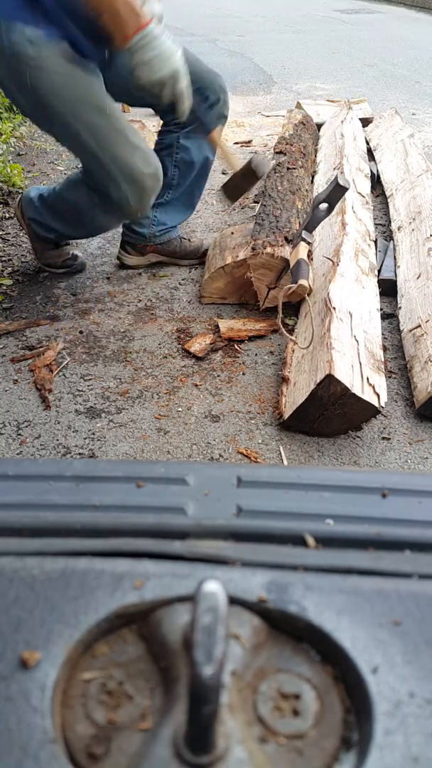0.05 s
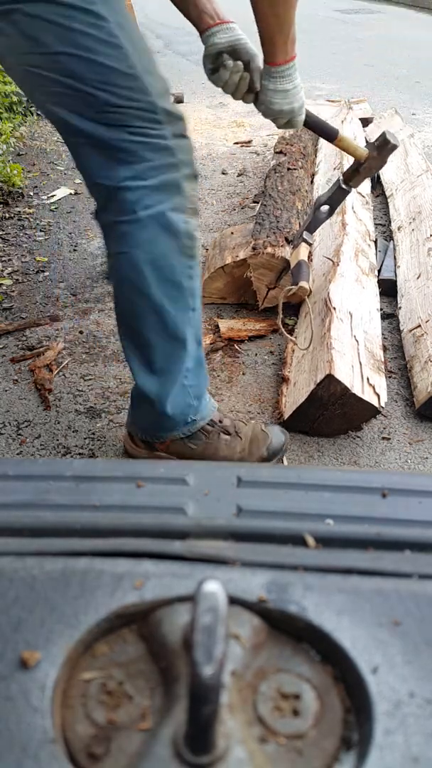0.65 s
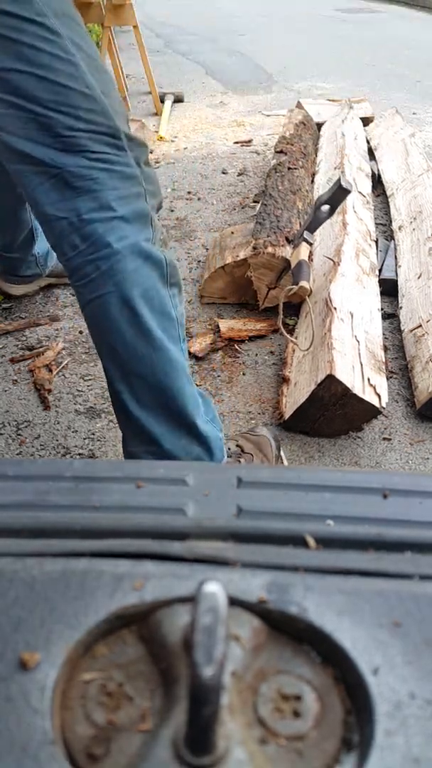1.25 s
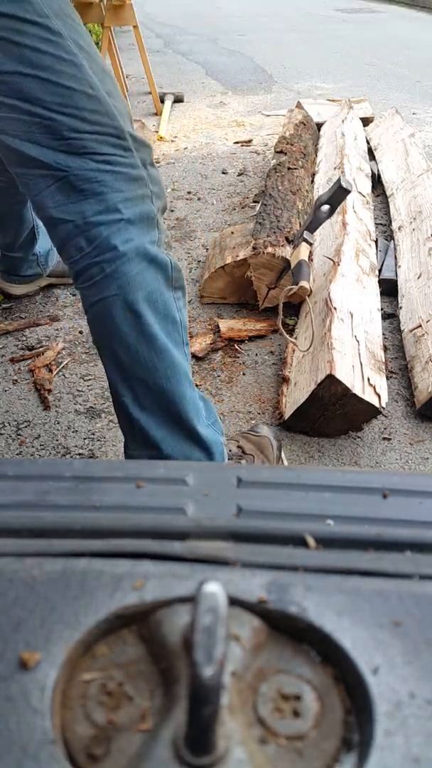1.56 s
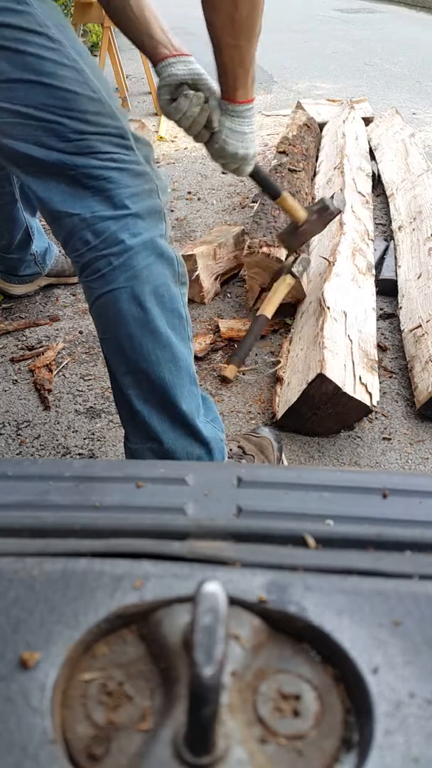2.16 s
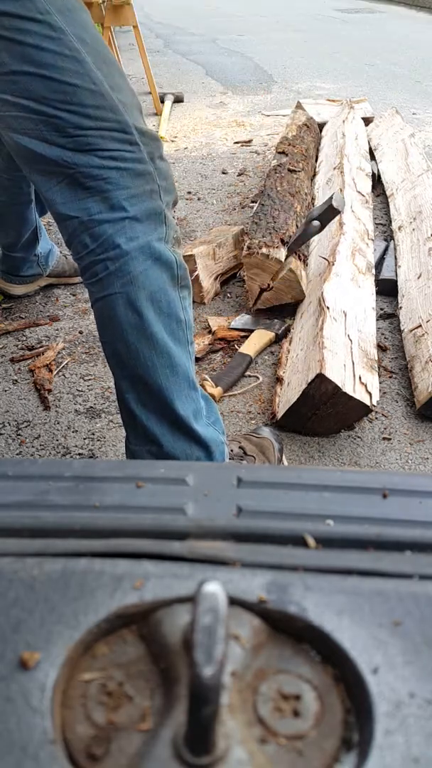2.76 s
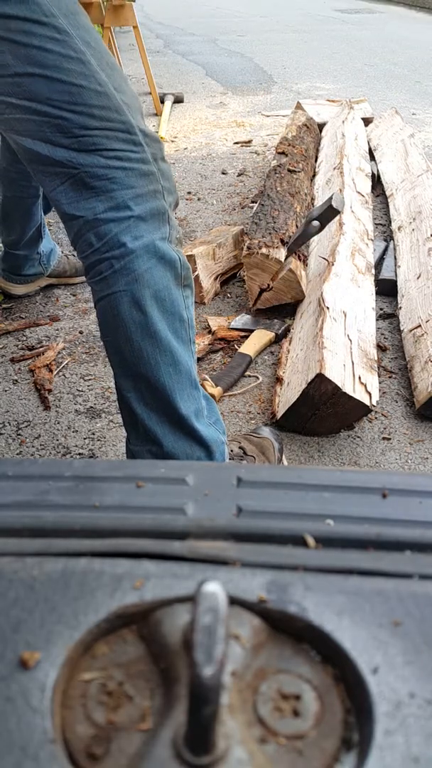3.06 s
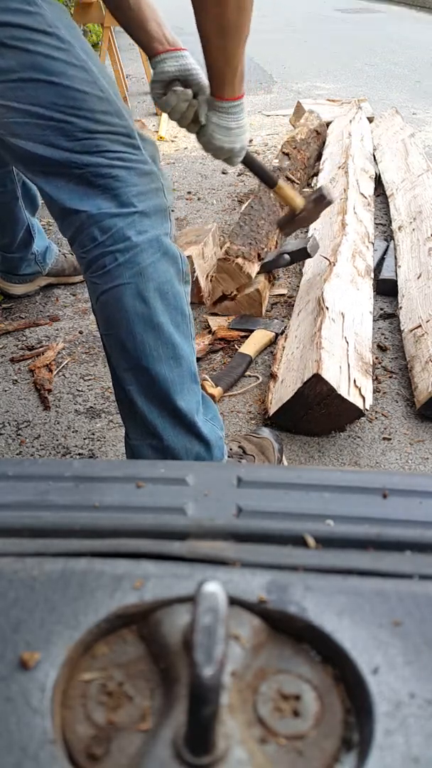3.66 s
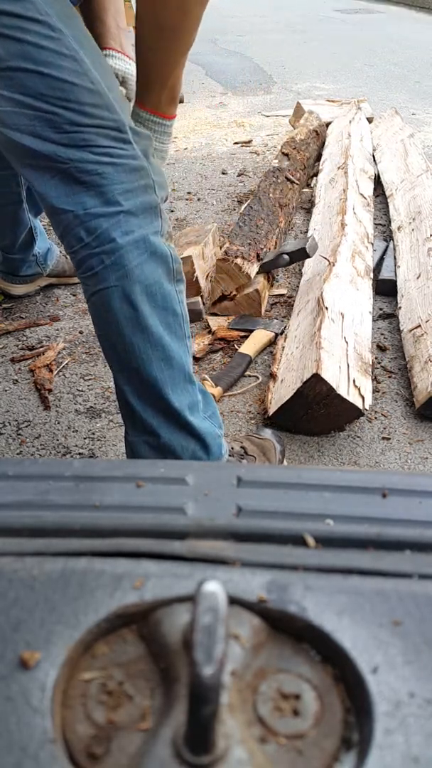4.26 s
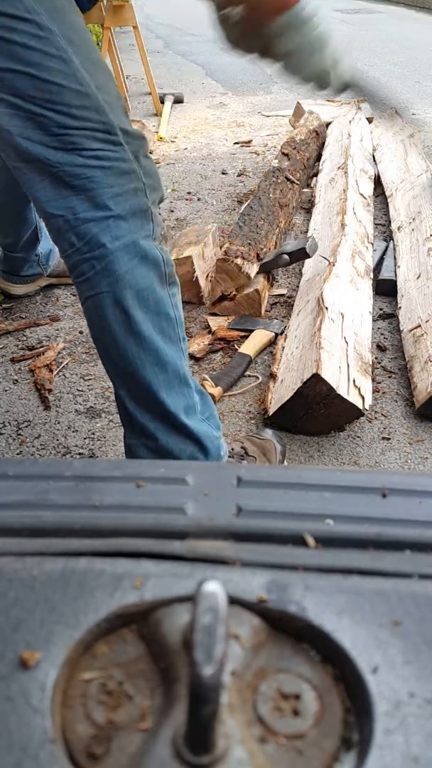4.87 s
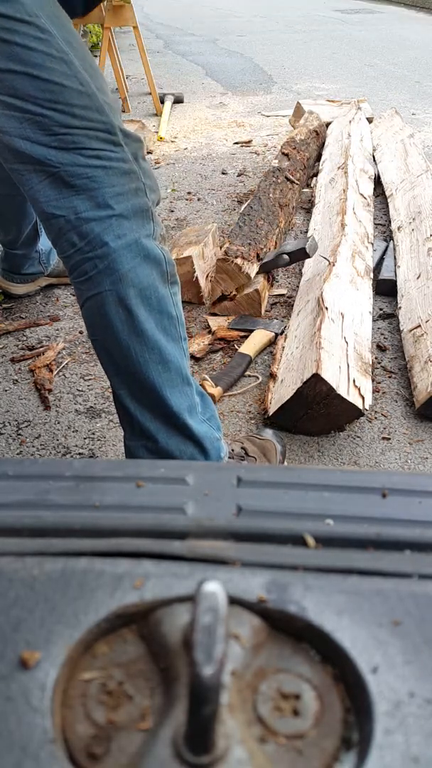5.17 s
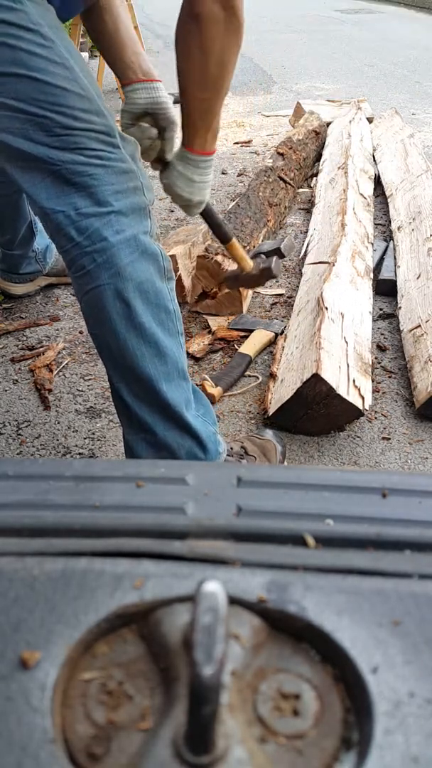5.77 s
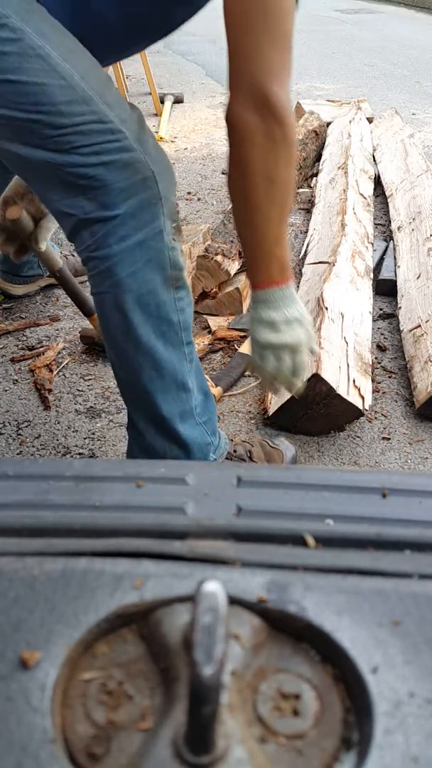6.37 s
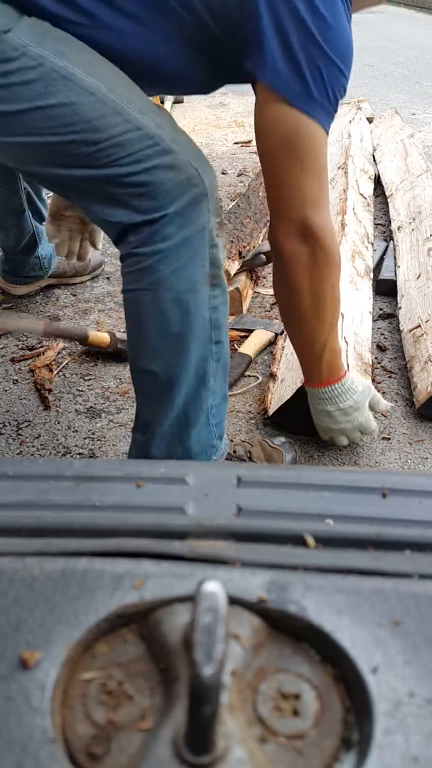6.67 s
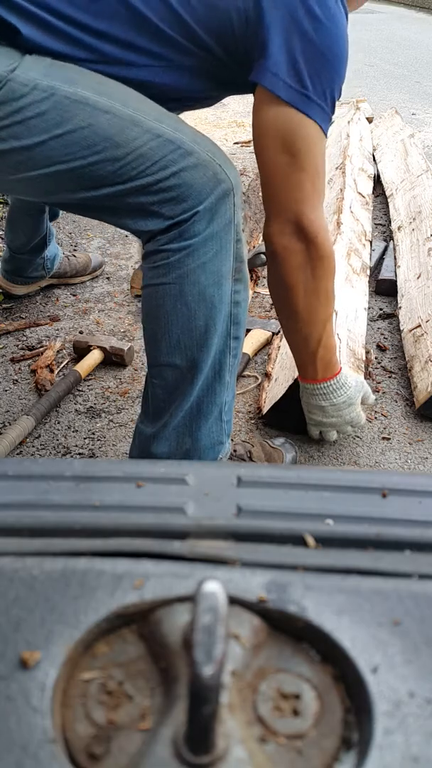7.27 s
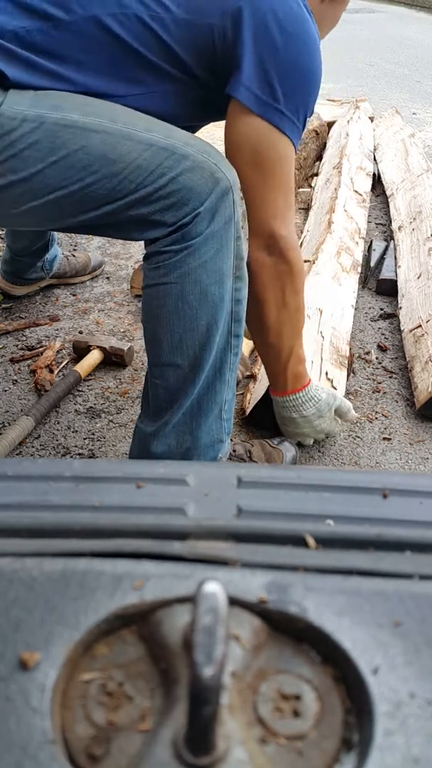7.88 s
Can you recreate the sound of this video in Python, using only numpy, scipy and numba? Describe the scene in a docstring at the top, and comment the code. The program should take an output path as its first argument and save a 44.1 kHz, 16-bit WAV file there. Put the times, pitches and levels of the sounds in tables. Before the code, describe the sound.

Four spaced hammer blows on a hatchet in wood, the first duller, the rest ringing, with wooden clatter and faint boot scuffs outdoors.

```python
"""A paved yard, where a hammer drives a steel hatchet into a log with four ringing blows.
Each blow cracks, sets both steel heads ringing and thuds into the ground. Wood knocks and rocks,
splinters snap, loose tools clink and boots scuff on grit. Hard surfaces close by smear each hit into
a short, dense tail. An automatic gain control turns the sound down at every blow, waits, and then
lets the steady outdoor rush swell back."""
import sys
import numpy as np
from scipy import signal
from scipy.fft import rfft, irfft, next_fast_len
from scipy.io import wavfile
from scipy.ndimage import uniform_filter1d, minimum_filter1d
from numba import njit

SR = 44100
rng = np.random.default_rng(int(sys.argv[2]) if len(sys.argv) > 2 else 0)


def waveform_to_disk(signal):
    """Save audio, clipped to [-1, 1], as 16-bit WAV at the path in sys.argv[1]."""
    frames = np.transpose(np.atleast_2d(signal))
    scaled = np.clip(frames, -1, 1) * 32767
    samples = np.round(scaled).astype(np.int16)
    wavfile.write(sys.argv[1], SR, samples)


N = 349713
SPAN = 16384   # samples in one short sound
AGE = np.arange(SPAN) / SR   # seconds since that sound began

# Hammer blows. Each row: start in seconds, crack in dB, treble tilt in dB per octave, thud in dB,
# hammer ring in dB, hatchet ring in dB, place hit along the hatchet from 0 to 1.
BLOWS = [(0.680, -13.5, -7, -41, -25, -28.5, 0.167), (2.0108, -5.5, 2, -16, -22, -7, 0.47),
         (3.506, -6, 2.5, -21, -19, -8.5, 0.16), (5.59, -4.5, 3, -19, -20, -11.5, 0.38)]
# The hammer's modes (its natural tones). Each row: pitch in Hz, flutters per second, level in dB.
HAMMER_MODES = [(2620, 330, 1.5), (3790, 400, -6), (5030, 600, -9.5), (11100, 600, -19)]
# The hatchet's bending modes. The lists give pitch in Hz, level in dB and flutters per second.
HATCHET_HZ = [4810, 8180, 8610, 10230, 14300]
HATCHET_DB = [2, -10, -7, -7, -11]
HATCHET_FLUTTER = [115, 260, 120, 381, 240]
# Modes of the log and of a loose tool. Each row: pitch in Hz, level in dB, seconds to fade 60 dB (t60).
LOG_MODES = [(171, -5, 0.09), (215, -3, 0.086), (338, -9.5, 0.049), (443, 1.5, 0.057), (518, 2, 0.026),
             (591.5, 2, 0.017), (646, 3.5, 0.049), (788, 1.5, 0.066), (923, 1.5, 0.042), (1180, 2.5, 0.021),
             (1674, -2.5, 0.046), (2100, 4, 0.018), (2940, 6.5, 0.0053)]
TOOL_MODES = [(328, -2.5, 0.13), (597, 2.5, 0.1), (805, 0, 0.099), (953, 0.5, 0.038), (1690, 7.5, 0.026),
              (2610, 6, 0.021), (2690, -3, 0.18), (3000, 5, 0.026)]
# Wood knocks and tool clinks. Each row: start in seconds, level in dB, centre in Hz, spread in octaves.
KNOCKS = [(0.686, -12, 562, 0.11), (2.040, -18.5, 540, 0.95), (2.085, -19, 880, 0.35),
          (2.325, -37, 594, 0.86), (2.514, -32, 573, 0.46), (2.598, -33.5, 570, 0.38),
          (2.856, -39.5, 310, 0.49), (3.737, -43, 315, 0.82), (5.773, -39, 2100, 0.65),
          (5.874, -40.5, 328, 0.96)]
CLINKS = [(2.330, -55, 2700, 0.27), (2.712, -48.5, 2630, 0.35), (6.425, -43, 1100, 0.76),
          (6.963, -39.5, 900, 2.1)]
# Splinters snapping. Each row: start in seconds, level in dB.
SNAPS = [(2.282, -55), (2.583, -57), (5.773, -45), (6.351, -52.5), (6.422, -47)]
# Boot scuffs. Each row: middle in seconds, half length in seconds, level in dB.
SCUFFS = [(0.917, 0.017, -48), (1.012, 0.073, -41.5), (1.07, 0.018, -44), (6.257, 0.062, -52)]
# The tone colour of each noise. Each row: frequency in Hz, relative strength there in dB.
CRACK_COLOUR = [(100, -24), (280, -13), (450, 1), (1100, -1), (1500, 0), (2000, -4.5), (2700, -2),
                (3300, -7.5), (3900, -8), (5500, -8.5), (7500, -18), (11000, -12.5), (13000, -16),
                (15500, -20.5)]
SNAP_COLOUR = [(800, 5), (2500, 2), (6000, 0.5), (10000, -0.5), (15500, -13)]
SCUFF_COLOUR = [(300, -9), (800, 7), (1400, 7), (2300, 3), (4000, -13.5), (8000, -21), (15000, -34)]
RUSH_COLOUR = [(30, -5), (55, -16), (75, 0.5), (250, 1), (450, -2.5), (1000, -4), (1300, -10.5),
               (3000, -15.5), (4300, -21), (6000, -20.5), (7600, -27.5), (10000, -24.5), (12000, -33.5),
               (15500, -41)]
# Peaks and dips in the rush. Each row: centre in Hz, width in Hz, boost or cut in dB.
RUSH_PEAKS = [(165, 2.8, 6.5), (196.2, 4.4, -24), (242, 3.2, 6.5), (340, 23, -4.5), (382.6, 29, 5),
              (466.5, 10.3, -23), (518.3, 5.7, 7.5), (6750, 400, 5)]
# The yard's short tail. Each row: frequency in Hz, seconds to fade 60 dB.
YARD_T60 = [(100, 0.16), (500, 0.25), (1500, 0.21), (3000, 0.21), (6000, 0.16), (14000, 0.084)]
# How alike left and right are. Each row: frequency in Hz, likeness from -1 (opposite) to 1 (same).
YARD_LIKENESS = [(100, -0.02), (300, 0.99), (650, 0.39), (1400, -0.4), (3000, 0.1), (15000, 0.11)]
RUSH_LIKENESS = [(60, 1), (300, 0.98), (700, 0.92), (1400, 0.22), (4000, 0.1), (15000, 0.2)]
# Which side is louder. Each row: frequency in Hz, left over right in dB.
YARD_BALANCE = [(100, -1), (500, -1.5), (1000, -6), (2500, 1), (5000, -0.5), (9000, -8), (14000, 4)]
RUSH_BALANCE = [(60, -0.5), (380, 1), (700, -8), (1300, 1), (2400, 0.5), (4400, -1.5), (8100, -13.5),
                (15000, 3.5)]


def blows(tilt_from_hz=5000, click_db=-10.5, tearing_db=1.5):
    """Steel meets steel: a click, its smear roughened by tearing fibres, a ring and a thud."""
    out = np.zeros((2, N))
    treble_octaves = np.log2(np.hypot(1, bins(SPAN) / tilt_from_hz))
    for s, crack_db, tilt_db, thud_db, hammer_db, hatchet_db, place in BLOWS:
        colour_db = at_hz(CRACK_COLOUR, bins(SPAN)) + tilt_db * treble_octaves
        click = at_level(yard(colour_db, length=0.051, late_db=-60.5), crack_db + click_db)
        smear = yard(colour_db, length=0.88, build_s=0.0049, late_db=-34.5, echo_db=-42)
        crack = at_level(with_wall(smear * grains(tearing_db)), crack_db)
        add(out, s, click + crack + steel(hammer_db, hatchet_db, place) + thud(thud_db))
    return out


def steel(hammer_db, hatchet_db, place, hammer_t60=0.22, hatchet_t60=0.19):
    """Both heads ring. A hatchet mode is louder the more it swings where the hammer lands."""
    half_waves = np.arange(len(HATCHET_HZ)) + 3   # along the hatchet, for each mode
    swings = np.cos(np.pi * half_waves * place)
    shares = np.hypot(swings, 0.18)   # the broad hammer face wakes a mode even at a still point
    hatchet = 0
    for share, hz, db, flutter in zip(shares, HATCHET_HZ, HATCHET_DB, HATCHET_FLUTTER):
        t60 = hatchet_t60 * (HATCHET_HZ[0] / hz) ** 0.1   # higher modes die sooner
        hatchet += share * ring(hz, flutter, hatchet_db + db, t60)
    hammer = sum(ring(hz, flutter, hammer_db + db, hammer_t60) for hz, flutter, db in HAMMER_MODES)
    return hatchet + hammer


def ring(hz, flutter_per_s, db, t60, flutter_depth=1.05, late_db=-38, late_t60=0.5, build_s=0.001):
    """One fading steel tone. Reflections make it flutter, differently on the left and right."""
    knots = rng.standard_normal((2, 2, 256))
    waver = np.array([np.interp(AGE * flutter_per_s, np.arange(256), a + 1j * b) for a, b in knots])
    steady = np.array([[1], [1j]])   # the two sides are a quarter cycle apart
    tone = np.real((steady + flutter_depth * waver) * np.exp(2j * np.pi * hz * AGE))
    attack = 1 - np.exp(-AGE / build_s)
    fade = from_db(-60 * AGE / t60) + from_db(late_db - 60 * AGE / late_t60)
    sides = from_db(np.array([[1], [-1]]) * at_hz(YARD_BALANCE, hz) / 2)
    return at_level(tone * fade * attack * sides, db)


def thud(db, band_hz=(90, 340), length_s=0.039):
    """The log is rammed against the paving: a brief, dull push."""
    push = irfft(noise_spectrum(0)) * np.exp(-(AGE / length_s) ** 4)
    bass_filter = signal.butter(2, band_hz, "band", fs=SR, output="sos")
    return at_level(signal.sosfilt(bass_filter, push), db)


def wood(loose_below_db=-25, edge_lead_s=0.018, edge_db=-8.5, rebound_s=0.05, rebound_db=-13):
    """Wood driven by the hammer slams down once. A loose piece ticks on an edge, lands and rebounds."""
    loose = [knock for knock in KNOCKS if knock[1] < loose_below_db]
    # The edge touches first, softer and 0.63 octaves brighter.
    edges = [(s - edge_lead_s, db + edge_db, hz * 2 ** 0.63, 1) for s, db, hz, _ in loose]
    rebounds = [(s + rebound_s, db + rebound_db, hz, spread) for s, db, hz, spread in loose]
    landings = knocks(list(KNOCKS) + rebounds, LOG_MODES, length=0.69, build_s=0.0044, late_db=-44)
    ticks = knocks(edges, LOG_MODES, length=0.68, build_s=0.0004, late_db=-33.5)
    return landings + ticks


def knocks(contacts, modes, **tail):
    """Each contact rings an object's modes, favouring those near one pitch. The yard smears them."""
    out = np.zeros((2, N))
    hz, mode_db, t60 = np.transpose(modes)[:, :, None]
    rings = np.sin(2 * np.pi * hz * AGE) * from_db(mode_db - 60 * AGE / t60)
    rings[::2] *= -1   # neighbouring modes swing in opposite directions
    for s, db, centre_hz, spread in contacts:
        off_centre = np.log2(hz / centre_hz) / spread
        body = np.sum(rings / (1 + off_centre ** 2), axis=0)
        smeared = signal.fftconvolve(yard(**tail), body[None], axes=1)[:, :SPAN]
        add(out, s, at_level(smeared, db))
    return out


def tools():
    """Loose hand tools clink on the paving and ring briefly."""
    return knocks(CLINKS, TOOL_MODES, length=1, build_s=0.0004, late_db=-28)


def splinters():
    """Splinters and bark snap: sharp clicks that die away in the yard."""
    out = np.zeros((2, N))
    for s, db in SNAPS:
        add(out, s, at_level(yard(at_hz(SNAP_COLOUR, bins(SPAN))), db))
    return out


def boots(grain_db=1.5):
    """Grit crunches under boots: grainy noise that swells and fades."""
    out = np.zeros((2, N))
    for s, half_s, db in SCUFFS:
        grit = irfft(noise_spectrum(at_hz(SCUFF_COLOUR, bins(SPAN)))) * grains(grain_db)
        swell = np.exp(-(AGE / half_s - 2) ** 2)
        add(out, s - 2 * half_s, grit / grit.std() * from_db(db) * swell)
    return out


def yard(colour_db=0, length=1, build_s=0.0001, late_db=-31, late_t60=0.81, echo_s=0.177, echo_db=-34):
    """A click in the yard: dense reflections (length scales their time), a faint tail and a far echo."""
    spectrum = noise_spectrum(colour_db)
    bands_hz = np.geomspace(100, 12800, 8)
    nearest_band = np.argmin(abs(np.log((bins(SPAN) + 1) / bands_hz[:, None])), axis=0)
    attack = 1 - np.exp(-AGE / build_s)
    late = from_db(late_db - 60 * AGE / late_t60)
    out = 0
    for band, hz in enumerate(bands_hz):
        t60 = at_hz(YARD_T60, hz) * length
        near = attack * from_db(-60 * AGE / t60)
        echo = from_db(echo_db - 60 * abs(AGE - echo_s) / t60) * length / 2
        far = np.hypot(late, echo) / (1 + (hz / 7000) ** 2)   # far sound is duller
        out += irfft(spectrum * (nearest_band == band)) * np.hypot(near, far)
    return out


def with_wall(sound, delay_s=0.0334, db=-11.5):
    """A sound plus its slap back from a nearby wall."""
    lag = round(delay_s * SR)
    return sound + from_db(db) * np.pad(sound, ((0, 0), (lag, 0)))[:, :-lag]


def rush(db=-48, treble_lag_s=0.000413, lag_from_hz=900):
    """Steady outdoor noise. Its treble reaches the left side first."""
    size = next_fast_len(N, real=True)
    hz = bins(size)
    peaks_db = sum(boost * np.exp(-((hz - centre) / width) ** 2) for centre, width, boost in RUSH_PEAKS)
    left, right = noise_spectrum(at_hz(RUSH_COLOUR, hz) + peaks_db, RUSH_LIKENESS, RUSH_BALANCE, size)
    lag_s = treble_lag_s * (1 - np.exp(-(hz / lag_from_hz) ** 2 / 2))
    air = irfft([left, right * np.exp(-2j * np.pi * hz * lag_s)], size)[:, :N]
    return from_db(db) * air / air.std()


def noise_spectrum(colour_db, likeness=YARD_LIKENESS, balance=YARD_BALANCE, size=SPAN):
    """The spectrum of coloured stereo noise, partly shared between left and right."""
    hz, sign = bins(size), np.array([[1], [-1]])
    mid, side = rfft(rng.standard_normal((2, size)))
    alike = np.clip(at_hz(likeness, hz), -1, 1)
    pair = np.sqrt(1 + alike) * mid + sign * np.sqrt(1 - alike) * side
    return pair * from_db(colour_db + sign * at_hz(balance, hz) / 2)


def grains(depth_db, step=128):
    """A gain that moves to a new random value every few milliseconds."""
    return from_db(depth_db * np.interp(AGE, AGE[::step], rng.standard_normal(SPAN // step)))


def from_db(db):
    """Turn decibels into a gain."""
    return 10 ** (np.asarray(db) / 20)


def at_hz(points, hz):
    """Read between a table's rows, with octaves evenly spaced."""
    known_hz, values = np.transpose(points)
    return np.interp(np.log(hz + 1), np.log(known_hz), values)


def bins(size):
    """The frequencies of a spectrum, in Hz."""
    return np.fft.rfftfreq(size, 1 / SR)


def at_level(sound, db):
    """Give a short sound the energy of 100 ms at this level."""
    return sound * from_db(db) / np.sqrt(np.sum(sound ** 2) / SR * 10 + 1e-20)


def add(track, s, sound):
    """Mix a sound into a track, starting at s seconds."""
    start = round(s * SR)
    track[:, start:start + sound.shape[1]] += sound[:, :N - start]


def scene():
    """Everything that sounds in the yard."""
    return blows() + wood() + tools() + splinters() + boots() + rush()


@njit
def gain_control(level, gain, max_gain, threshold, fall_per_s=7.83, hold_s=1.154, rise_per_s=5.9):
    """Loud sound pushes the gain down towards 1. It waits, then climbs back up."""
    out, wait = np.empty(len(level)), 0.0
    for i in range(len(level)):
        excess = level[i] * gain / threshold
        if excess > 1:
            gain = max(1.0, gain / excess ** (fall_per_s / SR))
            wait = hold_s * SR
        elif wait > 0:
            wait -= 1
        else:
            gain += rise_per_s / SR * gain * (1 - gain / max_gain)
        out[i] = gain
    return out


def loudness(sound, size):
    """The running average level (rms) of both sides, over size samples."""
    return np.sqrt(np.maximum(uniform_filter1d(np.mean(sound ** 2, axis=0), size), 1e-12))


def record(dry, start_db=7.5, max_db=15.0, duck_above_db=-24, limit_db=-16, squeeze=0.59):
    """Slow gain control, a fast limiter that flattens each blow, then deep bass and top treble cut."""
    level = loudness(dry, size=441)
    ducked = dry * gain_control(level, from_db(start_db), from_db(max_db), from_db(duck_above_db))
    ahead = -minimum_filter1d(-loudness(ducked, size=300), size=200)   # the limiter sees a peak coming
    excess = np.maximum(ahead / from_db(limit_db), 1)
    rounded = np.tanh(ducked / excess ** squeeze)
    low_cut = signal.butter(2, 55, "high", fs=SR, output="sos")
    high_cut = signal.ellip(10, 0.1, 70, 16000, fs=SR, output="sos")
    return signal.sosfilt(high_cut, signal.sosfilt(low_cut, rounded))


dry = scene()
out = record(dry)
waveform_to_disk(out)
```